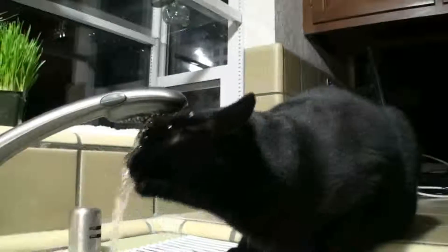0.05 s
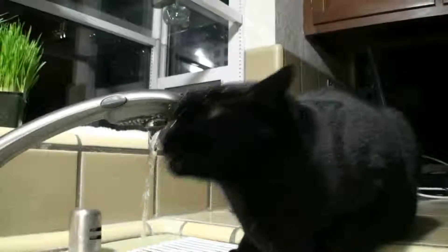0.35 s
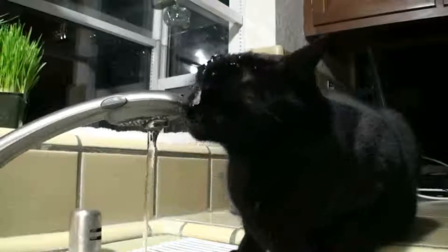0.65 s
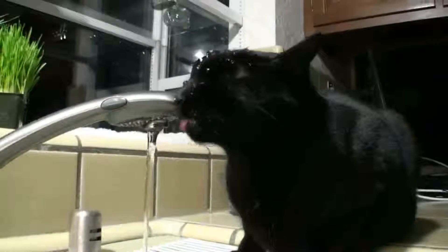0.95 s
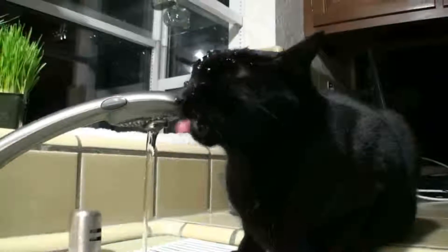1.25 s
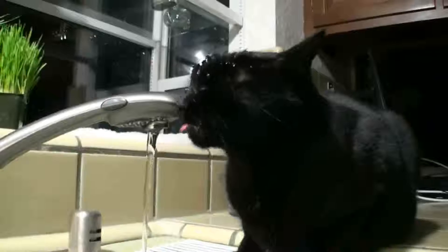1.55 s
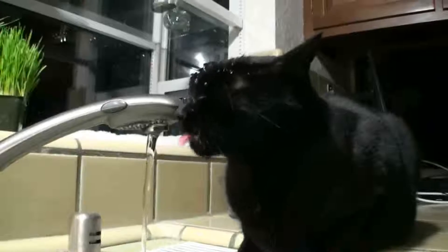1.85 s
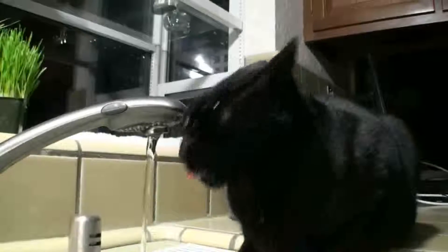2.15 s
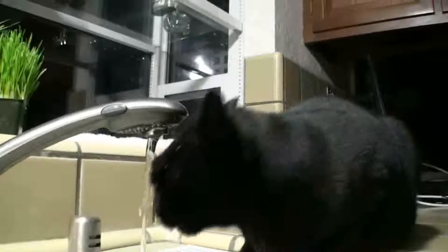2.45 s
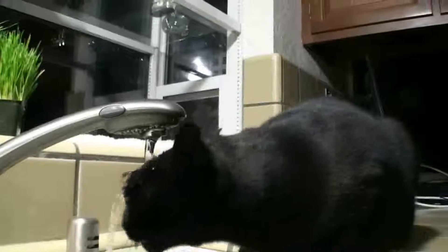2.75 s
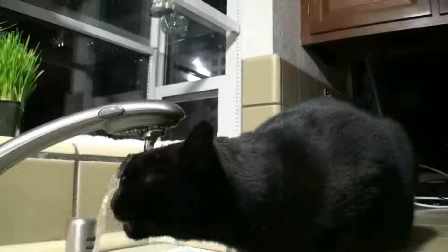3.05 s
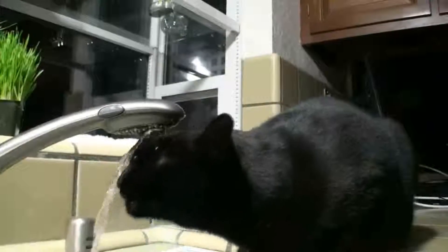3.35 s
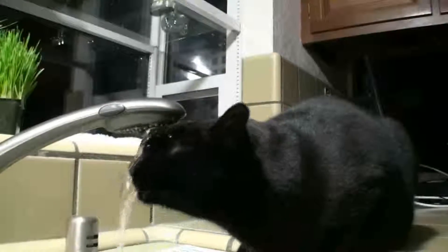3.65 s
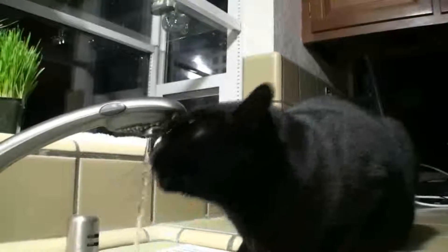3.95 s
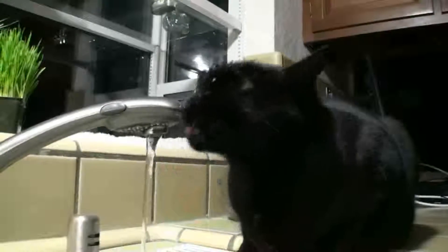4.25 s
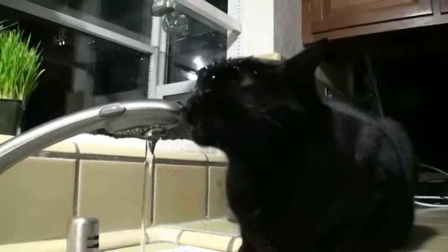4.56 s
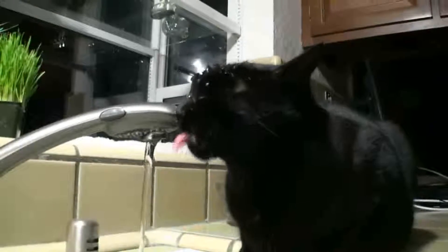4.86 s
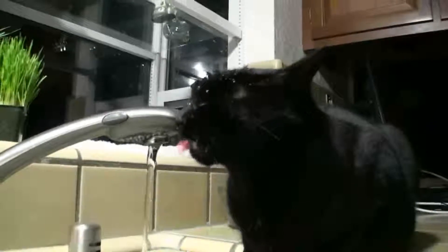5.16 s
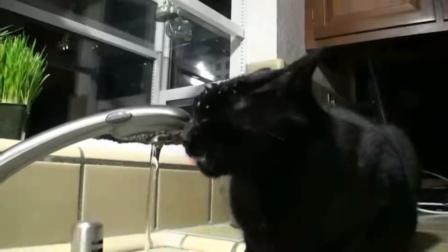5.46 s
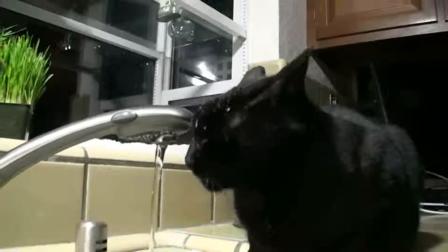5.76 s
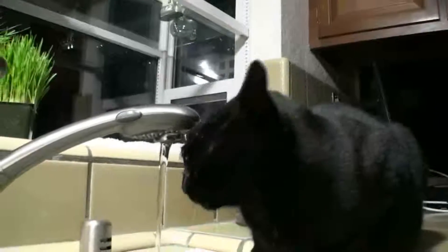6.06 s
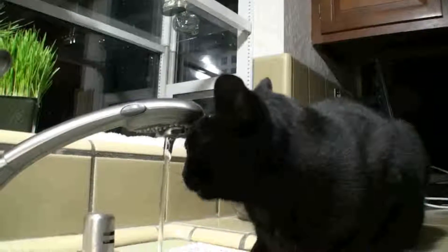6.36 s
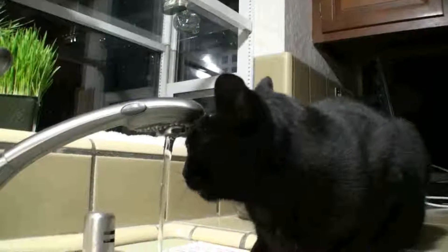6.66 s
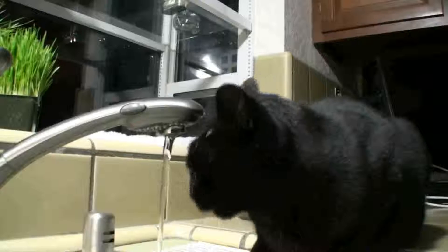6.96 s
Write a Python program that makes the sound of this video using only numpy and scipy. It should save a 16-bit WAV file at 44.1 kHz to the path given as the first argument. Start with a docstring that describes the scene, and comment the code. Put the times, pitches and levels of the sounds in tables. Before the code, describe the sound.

Close up in a tiled kitchen, water hisses steadily through a tap and drums softly in the basin. A drinking cat breaks the stream with small wet splats and gulps quietly several times. A second, louder flurry of drips follows, the sink takes one dull knock, and the cat swallows again. A thin whistle from the tap frays into hiss near the end.

```python
"""A tiled kitchen: a tap runs in a thin stream. Turbulence in the valve hisses through the spout,
with faint high tones and a wavering whistle near 5.8 kHz that frays into hiss near the end.
The stream drums softly in the basin. A cat puts its head under it, laps and swallows; drops splat
and trap bubbles. The basin takes a few soft blows and one louder, dull thump.
Close tiles return short, bright reflections of the hiss and the drops."""
import sys
import numpy as np
from scipy import signal
from scipy.fft import rfft, irfft, next_fast_len
from scipy.io import wavfile

SR = 44100
rng = np.random.default_rng(int(sys.argv[2]) if len(sys.argv) > 2 else 0)


def put_to_file(sound):
    """Save the sound as 16-bit audio at rate SR, in the file named by the first command-line argument."""
    columns = np.atleast_2d(sound).T  # one column per channel
    safe = np.clip(columns, -1, 1)
    whole_steps = np.round(safe * 32767)
    wavfile.write(sys.argv[1], SR, whole_steps.astype(np.int16))


N = 313110
TIME = np.arange(N) / SR
FFT_SIZE = next_fast_len(N + SR // 2, True)
HZ = np.maximum(np.arange(FFT_SIZE // 2 + 1) * SR / FFT_SIZE, 1)


def from_db(db):
    """Decibels to gain."""
    return 10 ** (np.asarray(db) / 20)


def unit_rms(x):
    """Scale to rms 1."""
    return x / np.sqrt(np.mean(x ** 2) + 1e-20)


def over_time(points):
    """(s, value) points interpolated to every sample."""
    return np.interp(TIME, *np.transpose(points))


def over_hz(points):
    """(Hz, value) points interpolated to every bin, in log frequency."""
    hz, value = np.transpose(points)
    return np.interp(np.log(HZ), np.log(hz), value)


def drift(rate_hz):
    """Random curve of rms 1, rolled off above rate_hz."""
    step = 32
    size = next_fast_len(N // step + 2, True)
    hz = np.arange(size // 2 + 1) * SR / (size * step)
    slow = irfft(rfft(rng.standard_normal(size)) / (1 + (hz / rate_hz) ** 2), size)
    return np.interp(np.arange(N) / step, np.arange(size), unit_rms(slow))


def resonances(rows):
    """Power per Hz of steep-sided peaks; widths at -3 dB."""
    return sum(from_db(db) ** 2 / (1 + (np.sqrt(2) - 1) * (2 * (HZ - hz) / width_hz) ** 2) ** 2
               for hz, width_hz, db in rows)


def turbulence(power_per_hz):
    """Stereo flow noise, partly alike on both sides."""
    # Each row: frequency in Hz, side over mid in dB.
    stereo_width = [(60, -19), (160, -18), (350, -9), (700, -7), (1400, -5.5), (2800, -6), (5600, -8),
                    (10000, -5.5), (11200, 0), (12000, -66)]
    mid, side = rfft(rng.standard_normal((2, FFT_SIZE))) * np.sqrt(power_per_hz * SR / 2)
    side = side * from_db(over_hz(stereo_width))
    return irfft([mid + side, mid - side])[:, :N]


def band(x, hz, octaves):
    """Band-pass around hz."""
    edges_hz = np.clip([hz * 2 ** (-octaves / 2), hz * 2 ** (octaves / 2)], 20, .45 * SR)
    return signal.sosfilt(signal.butter(2, edges_hz, "band", fs=SR, output="sos"), x)


def add(track, start_s, sound):
    """Mix a short sound into the track."""
    i = max(round(start_s * SR), 0)
    track[i:i + len(sound)] += sound[:max(N - i, 0)]


def tiles(x, early_db, early_t60_s, tail_db, tail_t60_s, width):
    """Sparse reflections off basin and tiles, plus the kitchen's diffuse tail."""
    t = TIME[:SR // 2]
    sparse = rng.standard_normal((2, len(t))) * (rng.random((2, len(t))) < .04)
    early = unit_rms(sparse * from_db(-60 * t / early_t60_s) * (t > .002))
    tail = unit_rms(rng.standard_normal((2, len(t))) * from_db(-60 * t / tail_t60_s) * (t > .008))
    mid, side = (from_db(early_db) * early + from_db(tail_db) * tail) / np.sqrt(len(t))
    response = [mid + width * side, mid - width * side]
    return irfft(rfft(x, FFT_SIZE) * rfft(response, FFT_SIZE))[:, :N]


def stream(flutter_db, rush_gain_db, basin_gain_db):
    """Falling water rushes unevenly and keeps the basin drumming."""
    # Each row: frequency in Hz, relative density in dB per Hz.
    rush_spectrum = [(20, -81.5), (65, -73.5), (100, -81), (250, -83), (600, -83), (1000, -80.5),
                     (2100, -86.5), (3500, -79.5), (5000, -80), (7500, -74), (10300, -77), (12000, -74.5),
                     (13800, -85), (15700, -101.3)]
    # Rises as the head moves in and out of the stream. Each row: time in seconds, gain in dB.
    splash = [(0, .7), (.4, 0.8), (1.5, -0.5), (3.0, 0.1), (4.25, 1.9), (4.9, 0.2), (5.6, -0.1), (7.1, 0)]
    # Each row: centre in Hz, width in Hz, relative peak density in dB per Hz.
    basin_peaks = [(125.8, 1.6, -60), (157.5, 38, -70.5), (168, 8.2, -68), (400, 163, -79.5),
                   (493, 31, -75.5), (641, 26, -75), (1171, 32, -73), (1387, 113, -78.5),
                   (1771, 127, -73.5), (1935, 21, -72), (2273, 150, -76)]
    rush = turbulence(from_db(over_hz(rush_spectrum)) ** 2)
    rush *= from_db(rush_gain_db + over_time(splash) + flutter_db * drift(26))
    drumming = turbulence(resonances(basin_peaks)) * from_db(basin_gain_db + 1.8 * drift(1.4))
    return rush + drumming


def tap_hiss(flutter_db):
    """Steady turbulence excites the resonances of valve and spout."""
    # Each row: centre in Hz, width in Hz, peak density in dB per Hz.
    spout_peaks = [(2675, 130, -76), (2923, 25, -68), (3074, 210, -73.5), (3380, 50, -72.5),
                   (4330, 350, -72), (4500, 252, -99.5), (4920, 55, -77), (5470, 290, -69.5),
                   (5654, 43, -60), (5844, 136, -60.5), (6840, 260, -78.5), (7500, 90, -75),
                   (8295, 145, -67), (9165, 430, -68.5), (11800, 95, -79.5), (11880, 46, -67.5),
                   (13340, 130, -78), (15300, 370, -71.5)]
    return turbulence(resonances(spout_peaks)) * from_db(flutter_db * drift(23))


def eddy_tone(hz, wander_hz, jitter_hz, flutter_db):
    """Near-sine of unsteady pitch and level, slightly out of phase between the sides; rms 1."""
    pitch_hz = hz + wander_hz * drift(4.79) + jitter_hz * drift(85.8)
    phase = 2 * np.pi * np.cumsum(pitch_hz) / SR + 0.11 * drift(36) * [[1], [-1]]
    return unit_rms(np.sin(phase) * from_db(flutter_db * drift(26)))


def valve_tones(gain_db):
    """Faint high tones of the valve; some swell now and then."""
    # Each row: pitch in Hz, relative rms level in dB.
    tones = [(4749, -45), (5587, -42), (6102, -49), (6127, -44), (9558, -46), (10104, -52), (10451, -47),
             (12450, -49)]
    # Each row: middle in seconds, length at half rise in seconds, rise in dB, tone's pitch in Hz.
    swells = [(.88, .25, 8, 10451), (1.45, .4, 5, 10451), (2.05, .2, 5, 10451), (2.4, .25, 6, 12450),
              (2.82, .3, 7, 10451), (3.35, .3, 5, 4749), (4.0, .2, 6, 10451), (5.15, .4, 6, 10451),
              (6.0, .28, 9, 12450), (6.47, .22, 9, 12450), (6.75, .3, 5, 4749)]
    corners = np.array([-3, -1, 1, 3]) / 4  # rise, hold, fall
    out = np.zeros((2, N))
    for hz, db in tones:
        swell_db = sum(np.interp(TIME, middle_s + length_s * corners, [0, rise_db, rise_db, 0])
                       for middle_s, length_s, rise_db, tone_hz in swells if tone_hz == hz)
        envelope = unit_rms(from_db(swell_db)) * from_db(db + gain_db)
        out += envelope * eddy_tone(hz, wander_hz=2.96, jitter_hz=7.8, flutter_db=4.0)
    return out


def whistle(gain_db, skirt_width_hz, flutter_db):
    """The valve whistles on two close tones; their noisy skirt takes over near the end."""
    # Main tone, then its weaker partner. Each row: pitch in Hz, relative level in dB.
    tones = [(5813, 0), (5790, -6)]
    # Each row: time in seconds, noise over tone in dB.
    fray = [(0, -8), (5.3, -3), (5.9, -4.5), (7.1, 17)]
    # Each row: time in seconds, relative level in dB.
    strength = [(0, -26.5), (.4, -30), (.68, -23), (1.0, -33), (1.2, -26), (1.85, -30), (2.1, -26),
                (2.55, -30), (3.15, -32.5), (3.55, -28.5), (4.75, -28.5), (5.1, -34.5), (5.35, -30),
                (6.2, -33), (7.1, -33)]
    skirt = unit_rms(turbulence(resonances([(tones[0][0], skirt_width_hz, 0)])))
    pair = sum(eddy_tone(hz, wander_hz=8, jitter_hz=6.12, flutter_db=1.3) * from_db(db)
               for hz, db in tones)
    noise_ratio = from_db(over_time(fray))
    blend = (unit_rms(pair) + noise_ratio * skirt) / np.sqrt(1 + noise_ratio ** 2)
    flutter = unit_rms(from_db(flutter_db * drift(27)))
    return blend * flutter * from_db(over_time(strength) + gain_db)


def spray(gain_db, spread_db, low_hz, high_hz, bands=10):
    """Tiny droplets of uneven size tick at random, each in one of several octave-wide bands."""
    # Densest while the head breaks the stream. Each row: time in seconds, droplets per second.
    rate = [(0, 130), (.6, 77), (1.0, 13), (2.9, 16), (3.4, 96), (3.8, 23), (4.3, 40), (4.9, 12), (7.1, 6)]
    hits = rng.random(N) < over_time(rate) / SR
    sizes = from_db(spread_db * np.minimum(rng.exponential(1, N), 2))
    impulses = hits * sizes * rng.choice([-1, 1], N)
    band_index = rng.integers(0, bands, N)
    ticks = sum(band(impulses * (band_index == k) + 1e-18, hz, octaves=1.0)
                for k, hz in enumerate(np.geomspace(low_hz, high_hz, bands)))
    return from_db(gain_db) * ticks


def thumps(gain_db, contact_s):
    """Soft blows ring the basin's modes, which alternate in sign."""
    # Each row: start in seconds, relative level in dB.
    blows = [(0.136, -34.5), (0.479, -35), (.508, -32.5), (2.282, -38), (4.116, -28), (4.137, -17.5)]
    # Each row: frequency in Hz, relative level in dB, T60 in seconds.
    modes = [(161.5, -2, 0.24), (222, -7, 0.062), (290, -18, .07), (438, -18.5, 0.093), (616, -15, 0.063),
             (750, -5.5, 0.027), (942, -14.5, 0.094), (1234, -16, 0.076), (1370, -19, .06)]
    out, t = np.zeros(N), TIME[:SR // 2]
    attack = 1 - np.exp(-t / contact_s)
    for start_s, db in blows:
        ring = np.zeros(len(t))
        for k, (hz, mode_db, t60_s) in enumerate(modes):
            envelope = from_db(mode_db + rng.normal(0, 1) - 60 * t / t60_s)
            ring += (-1) ** k * np.sin(2 * np.pi * hz * t) * envelope
        add(out, start_s, from_db(db + gain_db) * ring * attack)
    return out


def gulps(gain_db, decay_s, gap_s, second_db, second_ratio):
    """Each swallow is a soft double cluck in the cat's throat, the second slightly higher."""
    # Each row: start in seconds, relative level in dB, pitch in Hz.
    swallows = [(0.948, -33, 756), (1.17, -29, 750), (1.415, -32.5, 745), (1.777, -26.5, 786),
                (2.051, -28, 760), (4.485, -28.5, 740), (4.81, -27.5, 805), (5.048, -30, 760),
                (5.311, -28, 774)]
    out, t = np.zeros(N), TIME[:SR // 25]
    for start_s, db, hz in swallows:
        envelope = (1 - np.exp(-t / 0.00056)) * np.exp(-t / decay_s) * from_db(db + gain_db)
        add(out, start_s, envelope * np.sin(2 * np.pi * hz * t))
        second = from_db(second_db) * envelope * np.sin(2 * np.pi * hz * second_ratio * t)
        add(out, start_s + gap_s * rng.uniform(0.664, 1.22), second)
    return out


def splat(hz, octaves, attack_s=0.00059, decay_cycles=7.6):
    """Brief burst of wet noise, rms 1; low ones last longer."""
    t = TIME[:SR // 25]
    envelope = (1 - np.exp(-t / attack_s)) * np.exp(-t * hz / decay_cycles)
    return unit_rms(band(rng.choice([-1, 1], len(t)) * envelope, hz, octaves))


def drops(gain_db, scatter_delay_s, scatter_db, scatter_ratio, droplets=2):
    """Drops and tongue smacks splat; each scatters finer droplets that land just after."""
    # Each row: start in seconds, relative level in dB, centre in Hz, width in octaves.
    impacts = [(0.11, -27, 6100, 0.53), (0.187, -27.5, 7500, 2.2), (0.2364, -28.5, 4740, 1.0),
               (0.276, -29, 4970, 1.7), (0.32, -23.5, 5360, 0.86), (0.353, -22.5, 5500, .46),
               (0.502, -28.5, 7000, .34), (0.5663, -23, 6600, .65), (0.6161, -27, 5400, 1.4),
               (0.878, -28.5, 4470, 1.3), (0.9936, -28, 10200, 0.58), (2.2852, -22, 5200, 0.35),
               (3.082, -26, 5670, .54), (3.231, -23.5, 5430, 1), (3.359, -23, 5900, 1.1),
               (3.397, -24.5, 6200, 2.4), (3.4517, -23.5, 2600, 1.8), (3.454, -16.5, 3000, 0.7),
               (3.4588, -22, 2790, 0.58), (3.4722, -22, 4400, 1.5), (3.57, -25.5, 6550, .88),
               (3.616, -28, 6900, 0.7), (3.630, -21, 5800, 1.3), (3.651, -24, 5860, 1.0),
               (3.9594, -29, 7050, 0.54), (4.1245, -24.5, 7700, 0.78), (4.1587, -20, 4430, 0.51),
               (4.2097, -28.5, 6850, 1.3), (4.3238, -20.5, 4750, 1.6), (4.35, -21.5, 8550, 1.0),
               (4.4089, -29, 7410, 0.26), (4.5086, -31, 6510, 1.2), (4.63, -23.5, 7100, 1.3),
               (4.702, -25, 4900, 0.84), (5.2661, -19, 5400, 0.36), (5.55, -28, 6500, 0.55),
               (6.0687, -29, 6700, 1.4), (6.219, -30, 9610, .6), (6.568, -28, 8700, .6),
               (6.8543, -21.5, 6100, 0.91), (7.0359, -26, 6700, .31)]
    out = np.zeros(N)
    for start_s, db, hz, octaves in impacts:
        gain = from_db(db + gain_db)
        add(out, start_s, gain * splat(hz, octaves))
        delays_s = rng.gamma(2, scatter_delay_s / 2, droplets)
        pitch_ratios = scatter_ratio * 2 ** rng.uniform(-0.48, 0.36, droplets)
        for delay_s, ratio in zip(delays_s, pitch_ratios):
            droplet = splat(min(hz * ratio, SR / 4), octaves=0.79)
            add(out, start_s + delay_s, gain * from_db(scatter_db) * droplet)
    return out


def bubbles(gain_db, decay_s, rise_fraction):
    """Air trapped by the fattest drops plinks, rising in pitch as it nears the surface."""
    # Each row: start in seconds, relative level in dB, starting pitch in Hz.
    plinks = [(0.236, -39, 1900), (0.6133, -32.5, 3100), (0.883, -31, 2400), (3.454, -18.5, 2580),
              (3.460, -22, 2020), (3.468, -23.5, 2220), (3.63, -21.5, 3350), (4.159, -30, 3640),
              (4.3235, -23.5, 2290), (4.7015, -24.5, 3860)]
    out, t = np.zeros(N), TIME[:SR // 25]
    glide = 1 + rise_fraction * (1 - np.exp(-t / (2 * decay_s)))
    envelope = (1 - np.exp(-t / 0.00088)) * np.exp(-t / decay_s)
    for start_s, db, hz in plinks:
        phase = 2 * np.pi * np.cumsum(hz * glide) / SR
        add(out, start_s, from_db(db + gain_db) * np.sin(phase) * envelope)
    return out


def scene():
    """Tap, stream and cat between tiled walls, slightly to the left."""
    # Each row: frequency in Hz, left over right in dB.
    balance = [(60, 0.5), (120, 0), (240, 2), (480, 0.5), (950, 1.5), (1890, 3.5), (3770, 3), (7520, 3),
               (15000, 0.5)]
    hiss = tap_hiss(flutter_db=0.36)
    hiss += tiles(hiss.mean(0), early_db=-7, early_t60_s=0.059, tail_db=-16, tail_t60_s=0.36,
                  width=0.056)
    tap = hiss + whistle(gain_db=-0.1, skirt_width_hz=60, flutter_db=2) + valve_tones(gain_db=0.5)
    water = stream(flutter_db=2.0, rush_gain_db=-0.37, basin_gain_db=-0.2)
    splashes = drops(gain_db=-6.5, scatter_delay_s=.007, scatter_db=-10.5, scatter_ratio=1.29)
    splashes += bubbles(gain_db=14.0, decay_s=.0025, rise_fraction=.45)
    splashes += spray(gain_db=-17, spread_db=4.5, low_hz=2600, high_hz=9300)
    cat = gulps(gain_db=3, decay_s=0.0031, gap_s=0.006, second_db=-4.5, second_ratio=1.02)
    basin = thumps(gain_db=1.3, contact_s=.005)
    room = tiles(splashes, early_db=-5.0, early_t60_s=0.077, tail_db=-11.5, tail_t60_s=0.41, width=0.22)
    mix = tap + water + splashes + cat + basin + room
    pan_gains = from_db(over_hz(balance) / 2 * [[1], [-1]])
    return irfft(rfft(mix, FFT_SIZE) * pan_gains)[:, :N]


def record(dry):
    """Soft peak limiting, then a steep low-pass."""
    ceiling, cutoff_hz = .8, 15850
    limited = dry / (1 + (dry / ceiling) ** 4) ** .25
    return signal.sosfilt(signal.ellip(12, .1, 90, cutoff_hz, fs=SR, output="sos"), limited)


dry = scene()
out = record(dry)
put_to_file(out)
```